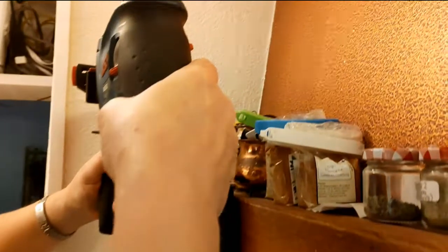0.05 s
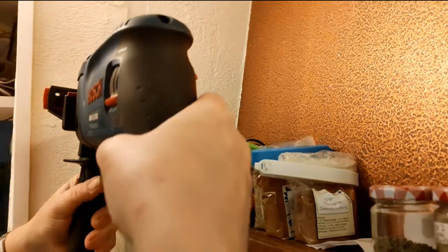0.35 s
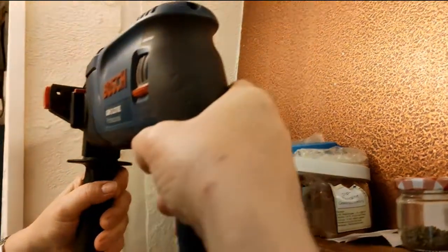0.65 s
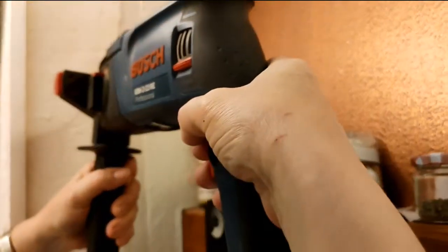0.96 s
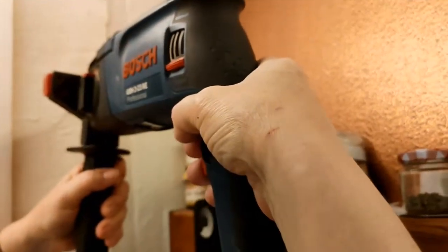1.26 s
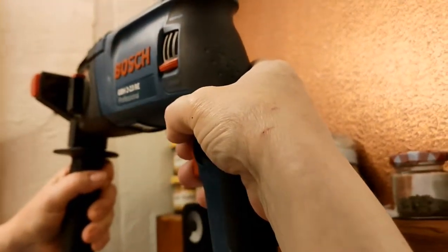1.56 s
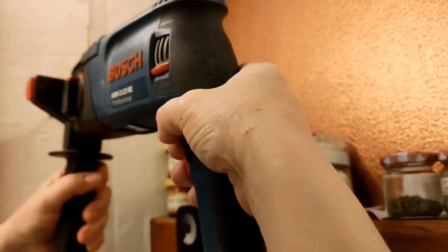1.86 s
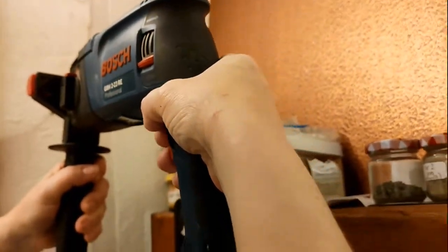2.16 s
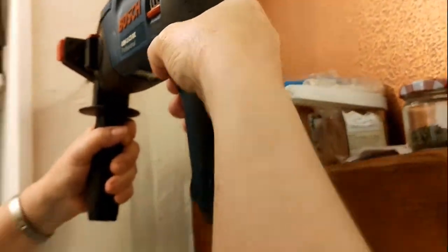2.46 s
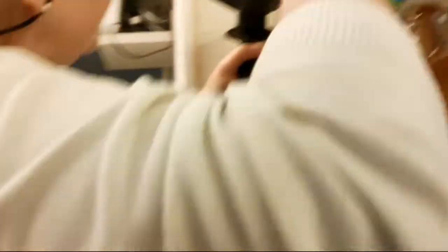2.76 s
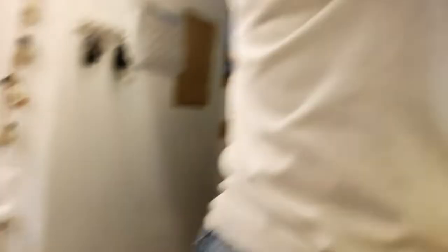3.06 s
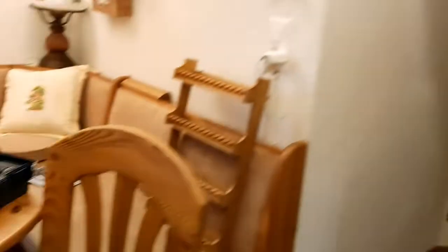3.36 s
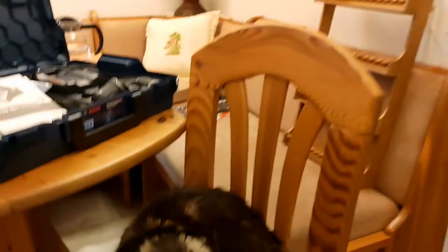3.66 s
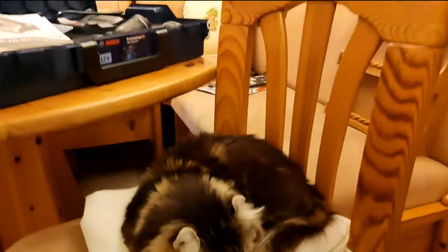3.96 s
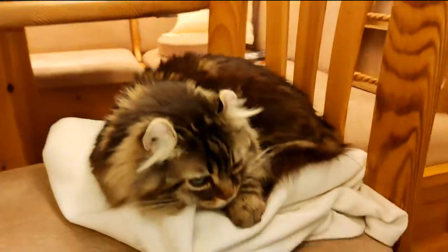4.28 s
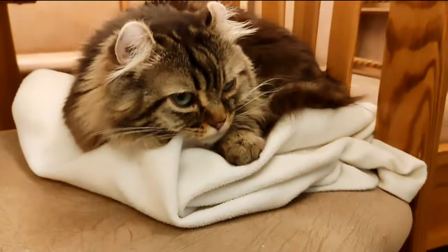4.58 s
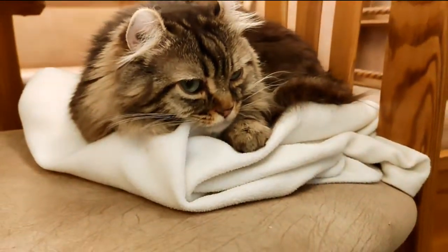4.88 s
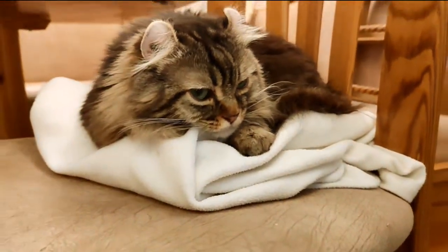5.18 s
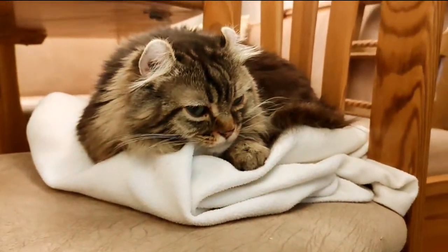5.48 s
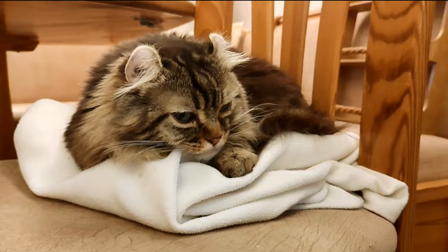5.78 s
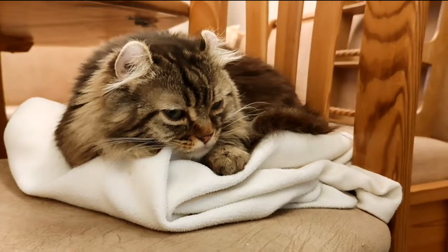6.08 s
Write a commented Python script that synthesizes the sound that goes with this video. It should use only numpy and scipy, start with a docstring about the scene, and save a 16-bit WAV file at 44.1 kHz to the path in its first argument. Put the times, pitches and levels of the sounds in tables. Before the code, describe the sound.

In a small room, a power drill whirs briefly, stops, then whines faster and faster before its bit bores into masonry.

```python
"""Electric drill in a small room

A hand drill in a furnished room makes a short slow run, then a long one that steps up to full speed.
Its gear teeth whine and clatter, the chuck ticks once a turn, the bit grazes the wall and then grinds in.
The hand-held microphone starts close beside the drill and turns away, with a few soft handling bumps."""
import sys
import numpy as np
from scipy import signal
from scipy.fft import rfft, irfft, next_fast_len
from scipy.io import wavfile
from scipy.ndimage import uniform_filter1d, map_coordinates

SR = 44100
rng = np.random.default_rng(int(sys.argv[2]) if len(sys.argv) > 2 else 0)


def master(y):
    """Save y as 16-bit WAV."""
    cut = np.clip(np.atleast_2d(y).T, -1, 1)
    pcm = np.round(cut * 32767)  # scale
    wavfile.write(sys.argv[1], SR, pcm.astype(np.int16))


N = 270333
TIME = np.arange(N) / SR
AWAY_S = (2.75, 3.99)  # the drill's parts grow fainter as the microphone turns away
GROWL_LAW = (-39, -0.24, -12)  # motor growl and hum, as arguments of loudness()

# trigger pulls: (on [s], spun up [s], starting level [dB], off [s], first chuck tick [s])
RUNS = [(0.735, 0.934, -17, 1.516, .9358), (1.883, 1.998, -37, 6.2, 2.1056)]
# the bit is pushed into the wall: (time [s], relative level [dB], rise [s], decay [s])
PUSHES = [(4.912, -11.5, 0.021, 0.27), (5.618, -17, 0.066, 24)]
# spectrum of gear clatter and hand rustle: (frequency [Hz], relative level [dB])
CLATTER_SPECTRUM = [(150, -41), (420, -15.5), (650, -14), (800, -2.5), (1020, -3.5), (1220, -9.5),
                    (1500, -1.5), (1780, 0), (2200, -4.5), (2600, 4.5), (3050, 2.5), (3550, -1),
                    (4200, -3.5), (5000, -18.5), (6200, -16.5), (7200, -52.5), (16000, -70)]


def amp(db):
    """Decibels to gain."""
    return 10 ** (np.asarray(db) / 20)


def unit(x):
    """Scales to rms 1."""
    return x / np.sqrt(np.mean(x ** 2) + 1e-20)


def curve(rows):
    """Joins (time, value) rows by straight lines."""
    return np.interp(TIME, *np.transpose(rows))


def at_frequency(points, hz):
    """Looks up (frequency, value) points on a logarithmic frequency axis."""
    f, value = np.transpose(points)
    return np.interp(np.log(hz + 1), np.log(f + 1), value)


def colour(x, spectrum):
    """Minimum-phase filter with the given spectrum; white noise keeps its power."""
    log_gain = np.log(amp(at_frequency(spectrum, abs(np.fft.fftfreq(4096, 1 / SR)))))
    response = np.exp(np.conj(signal.hilbert(log_gain)))
    taps = np.fft.ifft(response).real[:2048]
    return signal.oaconvolve(x, taps / np.linalg.norm(taps))[:N]


def noise():
    """White noise."""
    return rng.standard_normal(N)


def wander(hz):
    """Random drift of rms 1, up to the given rate."""
    size = next_fast_len(N)
    rolloff = 1 + (np.fft.rfftfreq(size, 1 / SR) / hz) ** 4
    return unit(irfft(rfft(noise(), size) / rolloff, size)[:N])


def grains(per_s, spread_db):
    """Sparse tiny impacts of uneven size."""
    size = amp(spread_db * np.minimum(rng.exponential(1, N), 4))
    return unit(size * np.sign(noise()) * (rng.random(N) < per_s / SR))


def resonate(x, hz, width):
    """A resonance of gain 1 at a fixed or moving frequency."""
    carrier = np.exp(2j * np.pi * np.cumsum(hz * np.ones(N)) / SR)
    pole = np.exp(-np.pi * width / SR)
    return 2 * (carrier * signal.lfilter([1 - pole], [1, -pole], x / carrier)).real


def rough_tone(hz, width):
    """A narrow band of noise at a drifting pitch, like stick and slip."""
    hz = hz * (1 + 0.0064 * wander(28))
    return unit(resonate(resonate(noise(), hz, width), hz, width))


def bursts(rows, rise, decay):
    """Envelope of short blows from (time [s], level [dB]) rows."""
    t, blows = np.arange(SR // 2) / SR, np.zeros(N)
    for s, db in rows:
        blows[round(s * SR)] = amp(db)
    shape = (1 - np.exp(-(t / rise) ** 2)) * np.exp(-t / decay)
    return signal.oaconvolve(blows, shape)[:N]


def swell(middle, half):
    """A smooth rise and fall around a moment."""
    return np.exp(-np.minimum(((TIME - middle) / half) ** 2, 50))


def onset(start, rise):
    """Rises smoothly from 0 to 1."""
    return 1 - np.exp(-np.minimum((np.maximum(TIME - start, 0) / rise) ** 2, 50))


def room_tone():
    """The room's faint low background, unrelated left and right."""
    # background noise: (frequency [Hz], relative level [dB])
    spectrum = [(25, -5.5), (60, -6), (150, -18), (400, -28.5), (1200, -37), (3200, -41.5), (5000, -44.5),
                (15000, -47.5)]
    return amp(-65.5) * np.array([unit(colour(noise(), spectrum)) for _ in range(2)])


def drones():
    """Low drones come and go as the microphone moves through the room."""
    # drones: (middle [s], half length [s], frequency [Hz], width [Hz], level [dB])
    swells = [(3.095, 0.33, 306, 80, -51.5), (3.7, 0.57, 155, 40, -65.5), (4.2, 0.27, 429, 40, -51.5)]
    return sum(rough_tone(hz, width) * amp(db) * swell(s, half) for s, half, hz, width, db in swells)


def handling():
    """Hand and sleeve rustle and rumble on the microphone; low bumps reach its two ports out of step."""
    # bumps of the hand: (time [s], level [dB], frequency [Hz])
    thumps = [(3.245, -31, 44.83), (3.325, -23.5, 63.2), (3.374, -30, 55), (3.495, -39, 49.9),
              (3.688, -25.5, 77)]
    # hand and sleeve shift: (middle [s], half length [s], rustle [dB], rumble [dB])
    shifts = [(0.126, 0.11, -69, -73), (0.552, 0.063, -75, -82), (3.288, 0.097, -74, -44),
              (3.5, 0.61, -72, -58)]
    swing = sum(amp(db) * np.exp(2j * np.pi * hz * (TIME - s) - ((TIME - s) * hz / 0.51) ** 2)
                for s, db, hz in thumps)
    bumps = np.array([swing.real, swing.imag]) * amp([[4], [-3]])
    rustle = np.array([colour(grains(2000, 3.5), CLATTER_SPECTRUM) for _ in range(2)])
    rumble = np.array([colour(noise(), [(50, 8), (120, -3.5), (300, -14), (2000, -48)]) for _ in range(2)])
    return bumps + sum(swell(s, half) * (rustle * amp(rustle_db) + rumble * amp(rumble_db))
                       for s, half, rustle_db, rumble_db in shifts)


def reflections():
    """One dense room response, alike at both ports in the bass and unrelated in the treble."""
    # reverberation of the furnished room: (frequency [Hz], time to fall 60 dB [s])
    decay_times = [(200, 0.24), (1000, 0.21), (4000, 0.31), (14000, 0.22)]
    hz, t, spectra = signal.stft(rng.standard_normal((2, round(.3 * SR))), SR, nperseg=256)
    coherence = at_frequency([(300, 0.77), (650, 0.56), (1200, 0.017)], hz)[:, None]
    spectra[1] = coherence * spectra[0] + np.sqrt(1 - coherence ** 2) * spectra[1]
    decay = amp(-60 * t / at_frequency(decay_times, hz)[:, None])
    tail = signal.istft(spectra * decay, SR, nperseg=256)[1]
    tail[:, :round(.003 * SR)] = 0
    return tail / np.linalg.norm(tail[0])


def room(x, near, hop=4096):
    """Drill and microphone move, so each set of reflections fades into the next; near sounds stay drier."""
    padded = np.pad(x + amp(-15) * near, (hop, 2 * hop))
    wet = np.zeros((2, N + SR))
    for at in range(0, N + hop, hop):
        block = padded[at:at + 2 * hop] * signal.windows.cosine(2 * hop)
        echoes = signal.fftconvolve(block[None], reflections(), axes=1)
        wet[:, at:at + echoes.shape[1]] += echoes
    away = np.interp(TIME, [2.7, 3.7], [0, 1])  # the direct sound weakens and crosses from left to right
    right_lag_s = 0.00019 * (1 - away) - 0.00016 * away
    left = x + near
    right = map_coordinates(left, [np.arange(N) - right_lag_s * SR], order=3)
    return np.array([left, right]) * amp(-4 - 4.9 * away) + wet[:, hop:hop + N] * amp(-1 + 2.71 * away)


def microphone_shade(x):
    """The microphone's body shades the far port, most near 2.5 kHz; the bass leans a little left."""
    # balance of the middle band as the microphone turns: (time [s], left minus right [dB])
    balance = [(1.0, 7), (2.4, -0.5), (3.2, -0.5), (3.8, -4), (4.7, -5), (5.3, -6.5), (6.1, -9)]
    bass = signal.sosfiltfilt(signal.butter(3, 1500, fs=SR, output="sos"), x)
    top = signal.sosfiltfilt(signal.butter(3, 4200, "high", fs=SR, output="sos"), x)
    middle = x - bass - top
    side = np.array([[.5], [-.5]])
    shade_db = side * curve(balance)
    return bass * amp(side * 2.44) + middle * amp(shade_db) + top * amp(0.26 * shade_db)


def tooth_rate():
    """Gear teeth meeting per second: the motor holds one speed, then moves quickly to the next."""
    # speed steps: (start [s], tooth rate [Hz])
    speeds = [(0.92, 1747), (1.095, 2089), (1.465, 1796), (1.99, 1765), (2.095, 2056), (2.225, 2460),
              (2.37, 2979), (2.415, 3246), (2.52, 3134), (2.715, 4034), (3.01, 4138), (3.27, 4336),
              (4.2, 4401)]
    starts, hz = np.transpose(speeds)
    step = np.maximum(np.searchsorted(starts, TIME) - 1, 0)
    return uniform_filter1d(hz[step], size=400)


def each_turn(first, until, teeth_per_turn=364):
    """The moments at which the chuck comes round to the same place."""
    turns = np.cumsum(tooth_rate()) / SR / teeth_per_turn
    first_turn, last_turn = np.interp([first, until], TIME, turns)
    return np.interp(np.arange(first_turn, last_turn), turns, TIME)


def powered(swell_depth, stop_s=0.0054):
    """Each run swells while the motor spins up, holds, and dies away when the trigger is let go."""
    return sum(onset(on, 0.0044) * amp(swell_depth * np.interp(TIME, [on, up], [start_db, 0]))
               * np.exp(-np.clip((TIME - off) / stop_s, 0, 50)) for on, up, start_db, off, _ in RUNS)


def loaded():
    """0 while the bit spins free, 1 once it is in the wall."""
    return onset(PUSHES[0][0], 0.067)


def loudness(db, per_octave_db, away_db, load_db=-2.5):
    """A part's gain follows speed and microphone distance; under load the gears press tight and quieten."""
    speed_db = per_octave_db * np.log2(tooth_rate() / 2000)
    distance_db = np.interp(TIME, AWAY_S, [0, away_db])
    return amp(db + speed_db + distance_db + load_db * loaded())


def mains_throb(depth, mains_hz=50):
    """At low speed the trigger feeds the motor one kick each mains cycle; at speed the torque evens out."""
    cycle = (TIME * mains_hz + .5) % 1
    kick = unit(cycle * np.exp(-2 * cycle / 0.28))
    share = depth * np.interp(tooth_rate(), [2400, 4200], [1, .3])
    return np.sqrt(1 - share + share * kick ** 2)


def gear_case(x):
    """The gear case and chuck ring with what shakes them."""
    # metal resonances: (frequency [Hz], width [Hz], level relative to the input [dB])
    modes = [(740, 31, -7), (992, 19, -17.5), (1726, 16, -9), (1770, 310, -13), (2163, 30, -5.5),
             (2820, 72, -27.5), (3013, 40, -14), (3120, 5.6, -35.5)]
    rings = sum(amp(db) * signal.lfilter(*signal.iirpeak(hz, hz / width, fs=SR), x)
                for hz, width, db in modes)
    return amp(-1) * (x + rings)


def grip_clicks():
    """The plastic grip and trigger give short thin clicks close to the microphone."""
    # clicks: (time [s], relative level [dB])
    clicks = [(.094, -60), (.156, -48.5), (.395, -63), (.425, -79), (.68, -76), (.7085, -60), (1.673, -65)]
    # a plastic click: (frequency [Hz], relative level [dB])
    spectrum = [(200, -6), (2400, -3.5), (3400, 16), (4600, -14), (7000, 6), (11000, 4), (16000, -7)]
    return colour(noise() * bursts(clicks, rise=0.00033, decay=0.0024), spectrum) * amp(11)


def chuck_ticks():
    """Metal chatters on metal: the chuck knocks at each start, then ticks once a turn until the bit bites."""
    # the motor takes up the slack: (time [s], relative level [dB])
    knocks = [(.7274, -39.5), (.7921, -42.5), (1.8876, -62.5), (1.9636, -50)]
    # body of a tick: (frequency [Hz], relative level [dB])
    body_spectrum = [(200, -26), (500, -5.5), (950, 2), (1250, -8.5), (1800, 4), (3200, 9.5), (4200, -7),
                     (6000, -17.5), (16000, -41.5)]
    # bright edge of a tick: (frequency [Hz], relative level [dB])
    edge_spectrum = [(2500, -38.5), (6000, 10.5), (8000, 16.5), (12000, -8.5), (16000, 0.5)]
    times = [s for *_, off, first in RUNS for s in each_turn(first, min(off, PUSHES[0][0]))]

    def chatter(gain):
        """Noise bursts for the knocks, and for ticks that follow the gain."""
        ticks = list(zip(times, np.interp(times, TIME, 20 * np.log10(gain))))
        return noise() * bursts(knocks + ticks, rise=0.004, decay=.0028)
    body = colour(chatter(loudness(-28, per_octave_db=-0.79, away_db=-7.5)), body_spectrum)
    edge = colour(chatter(loudness(-27.5, per_octave_db=1.5, away_db=-6)), edge_spectrum)
    return body * amp(32.5) + edge * amp(14.5)


def bit_grazing():
    """The tip skids on the wall and rubs it once a turn before it bites."""
    # skids of the tip: (time [s], relative level [dB])
    skids = [(3.905, -8), (3.921, -33), (3.934, -32), (4.95, -16)]
    # steel skidding on the wall: (frequency [Hz], relative level [dB])
    spectrum = [(300, -26), (950, 3), (1600, 5.5), (2400, -7), (3400, 7.5), (5000, -3), (9000, -9.5),
                (11000, 1), (12500, -9), (16000, -8)]
    skid = colour(grains(5200, 6.3) * bursts(skids, rise=0.0011, decay=0.0083), spectrum)
    contact = sum(swell(s, 0.0082) for s in each_turn(first=4.227, until=4.86))
    rub = unit(resonate(resonate(noise(), 2540, 620), 2530, 860))
    return skid + amp(-19.5) * contact * rub


def bit_boring():
    """The cutting edges crush masonry in uneven bites; the bit rings, squeals and groans; the wall hums."""
    # masonry being crushed: (frequency [Hz], relative level [dB])
    grind_spectrum = [(70, -38.5), (160, -28.5), (230, -29), (370, -12), (650, -20), (920, -7), (1200, -9),
                      (1700, -4.5), (2400, -2.5), (3050, 4), (3900, -5), (4800, -14), (6200, -9),
                      (7500, -46)]
    # fine grit: (frequency [Hz], relative level [dB])
    grit_spectrum = [(3000, -5.5), (6100, 10.5), (7200, 2), (9500, 4.5), (11300, 0.5), (12800, -16),
                     (16000, -27)]
    # ringing of the steel bit: (frequency [Hz], width [Hz], level [dB])
    bit_modes = [(2950, 30, -32), (3150, 33, -27), (3240, 39, -33.5)]
    # thin squeal in the hole, sinking as the push eases: (time [s], pitch [Hz])
    squeal_pitch = [(5.0, 16200), (5.27, 16100), (5.35, 11200), (5.51, 7800), (5.61, 7500), (5.76, 14900),
                    (5.93, 12200), (6.02, 15300)]
    push = sum(amp(db) * onset(s, rise) * np.exp(-np.maximum(TIME - s, 0) / decay)
               for s, db, rise, decay in PUSHES)
    bite = amp(1.5 * wander(90))
    grind = colour(grains(4000, 2.3), grind_spectrum) * amp(-1)
    grit = colour(grains(5700, 3.3), grit_spectrum) * amp(-19)
    ring = sum(rough_tone(hz, width) * amp(db) for hz, width, db in bit_modes) * (push / push.max()) ** 0.31
    squeal_hz = curve(squeal_pitch)
    squeal_db = -45 - 6 * np.log2(squeal_hz / 8000)
    squeal = rough_tone(squeal_hz, width=2000) * amp(squeal_db + 4.5 * wander(35))
    groan_s = 5.07  # a sagging groan as the bit first bites
    groan_hz = 1583 - 1100 * np.clip(TIME - groan_s, -.5, .5)
    groan = rough_tone(groan_hz, width=81) * amp(-26.5) * swell(groan_s, 0.042)
    lean = amp(-16) * onset(4.62, 0.15) * (1 - loaded())  # the tip leans on the wall before it cuts
    wall = rough_tone(158, width=37) * amp(-48.5) * np.sqrt(push + lean)
    return bite * (push * (grind + grit) + squeal * loaded() + groan) + ring + wall


def motor_running():
    """Loose gears clatter, the motor growls and rattles its housing, brushes and fan hiss."""
    # motor growl: (frequency [Hz], relative level [dB])
    growl_spectrum = [(60, -37), (170, -33.5), (240, -7.5), (320, -13), (440, 0.5), (580, 2), (680, -4.5),
                      (800, -4.5), (1200, -23), (4000, -40.5)]
    # brushes and fan: (frequency [Hz], relative level [dB])
    hiss_spectrum = [(2000, -3.5), (5200, 3), (6200, 14), (7300, -1), (8700, 8), (10300, -4.5),
                     (11300, -0.5), (13500, -9.5), (16000, -16)]
    clatter = colour(grains(5000, 2.8), CLATTER_SPECTRUM) * mains_throb(.5) * amp(-2 + wander(40))
    clatter *= loudness(-29.5, per_octave_db=7.05, away_db=-5)
    growl = colour(grains(2500, 0.57), growl_spectrum) * mains_throb(0.75) * amp(-2)
    growl *= loudness(*GROWL_LAW)
    hiss = colour(grains(11000, 2.6), hiss_spectrum) * mains_throb(.2)
    hiss *= loudness(-52.5, per_octave_db=14.7, away_db=-7.5)
    rattle = rough_tone(3030, width=190) * mains_throb(0.96)
    rattle *= loudness(-35.5, per_octave_db=2, away_db=-8)
    # the motor growls before the gears pick up
    return (clatter + rattle + hiss) * powered(1) + growl * powered(0.51)


def gear_whine(armature_teeth=10, rise_s=.008, case_cutoff_hz=4150):
    """Gear teeth meet with backlash: a fuzzy tone over the armature's hum, both stopping under load."""
    # the tone is loud where it meets a gear case resonance: (tooth rate [Hz], relative level [dB])
    case_response = [(1750, -24.5), (1800, -19.5), (2050, -25.5), (2460, -20.5), (2980, -13), (3240, -14.5),
                     (4030, -15.5), (4140, -22), (4340, -19.5), (4400, -20.5)]
    tooth_hz = tooth_rate() * (1 + 0.01008 * wander(40.1))
    phase = 2 * np.pi * np.cumsum(tooth_hz) / SR
    tone = unit(np.sin(phase + .9 * wander(90)))
    fuzz = unit(resonate(resonate(noise(), tooth_hz, 320), tooth_hz, 850))
    rough = np.interp(tooth_hz, [1800, 4000], [.4, .88])  # the teeth bounce more at speed
    driven = sum(onset(up - rise_s, rise_s) * (1 - onset(off - .03, 0.021)) for _, up, _, off, _ in RUNS)
    level_db = at_frequency(case_response, tooth_rate()) + np.interp(TIME, AWAY_S, [0, -3.5]) - 4
    mesh = (np.sqrt(1 - rough) * tone + np.sqrt(rough) * fuzz) * driven * amp(level_db)
    mesh = signal.sosfilt(signal.butter(8, case_cutoff_hz, fs=SR, output="sos"), mesh)
    shaft = np.sin(phase / armature_teeth + 0.89 * wander(25))
    mesh *= 1 + 0.1 * shaft  # the armature rocks the mesh once a turn
    hum = shaft * powered(0.73) * loudness(*GROWL_LAW) * amp(np.interp(tooth_hz, [2000, 4300], [-22, -7]))
    return (mesh + hum) * mains_throb(1) * (1 - loaded())


def scene():
    """The drill in its room, heard from the turning microphone over handling noise and room tone."""
    gears = gear_whine()  # fills the room and also reaches the microphone straight
    drill = gear_case(gears * amp(-2.5) + motor_running() + bit_boring() + bit_grazing())
    in_room = drill + drones()
    near = chuck_ticks() + grip_clicks() + gear_case(gears) * amp(-6)
    return microphone_shade(room(in_room, near)) + handling() + room_tone()


def record(dry):
    """The recorder passes sound up to 16 kHz."""
    lowpass = signal.firwin(511, 16000, window=("kaiser", 9), fs=SR)
    return signal.oaconvolve(dry, lowpass[None], "same")


dry = scene()
out = record(dry)
master(out)
```